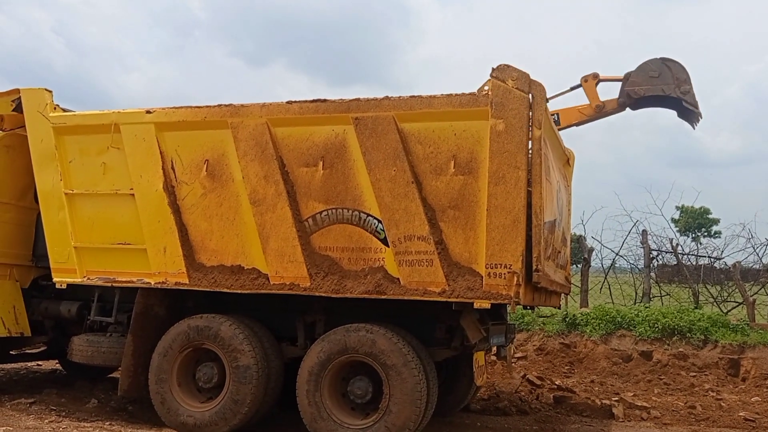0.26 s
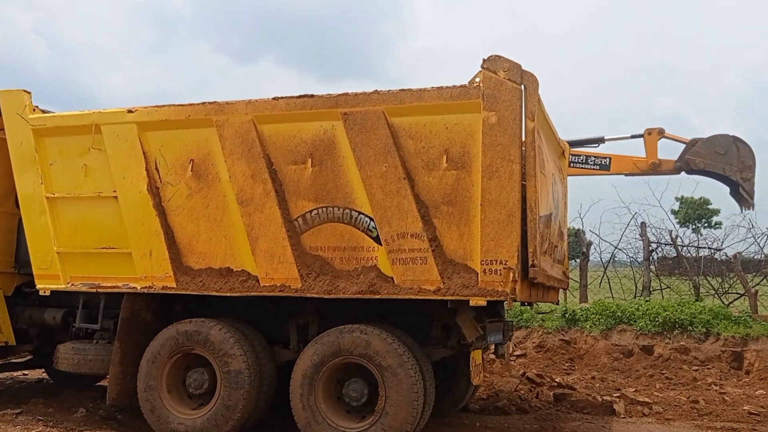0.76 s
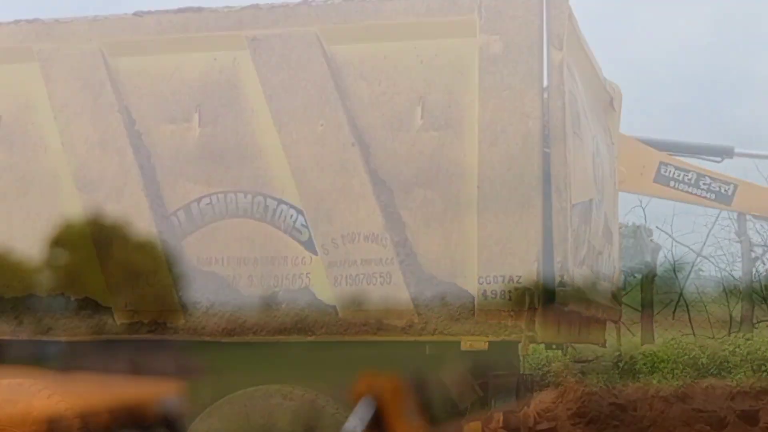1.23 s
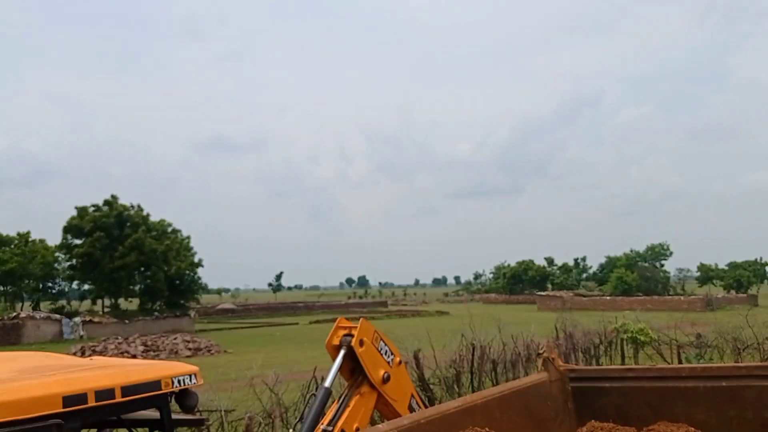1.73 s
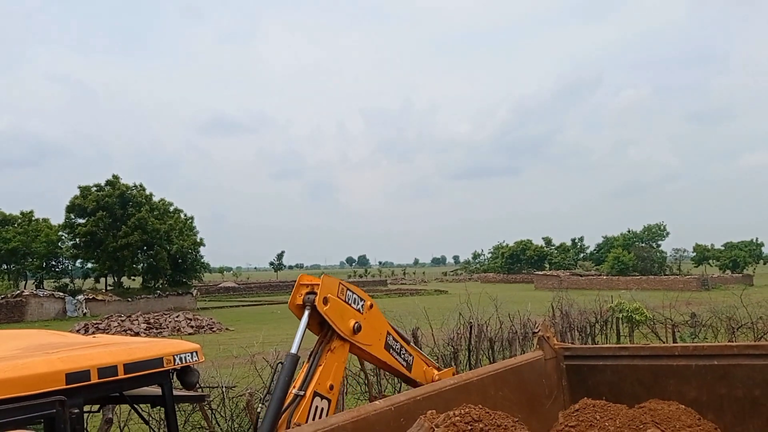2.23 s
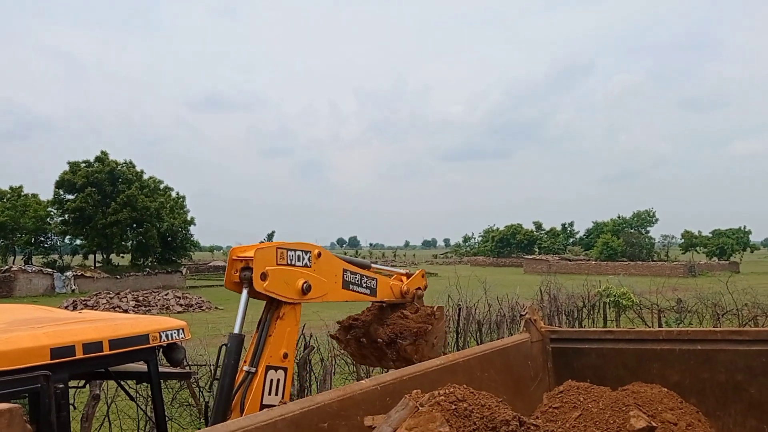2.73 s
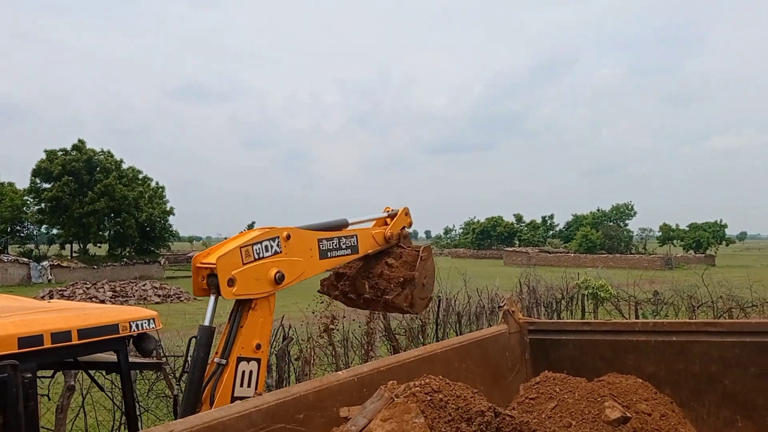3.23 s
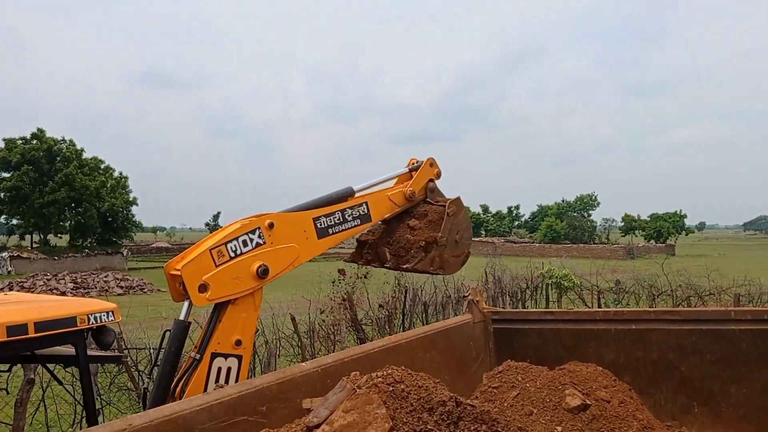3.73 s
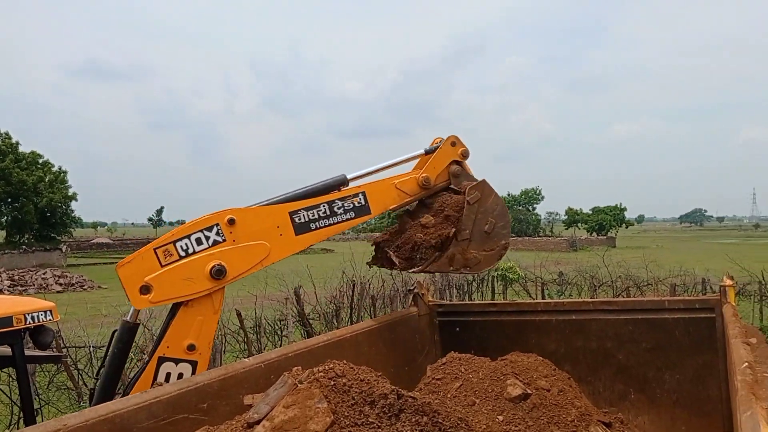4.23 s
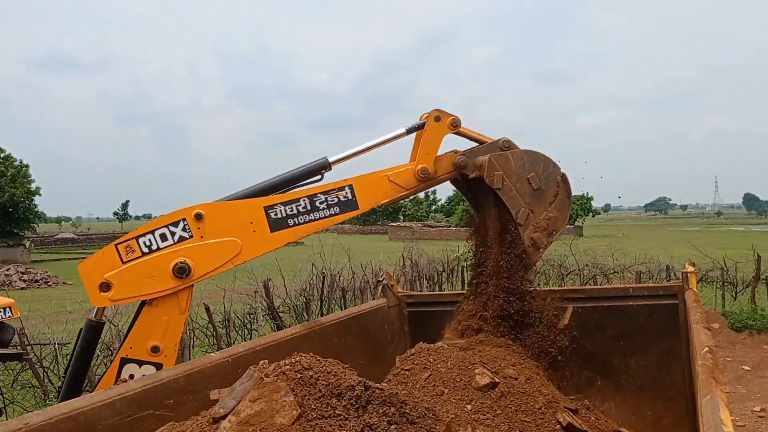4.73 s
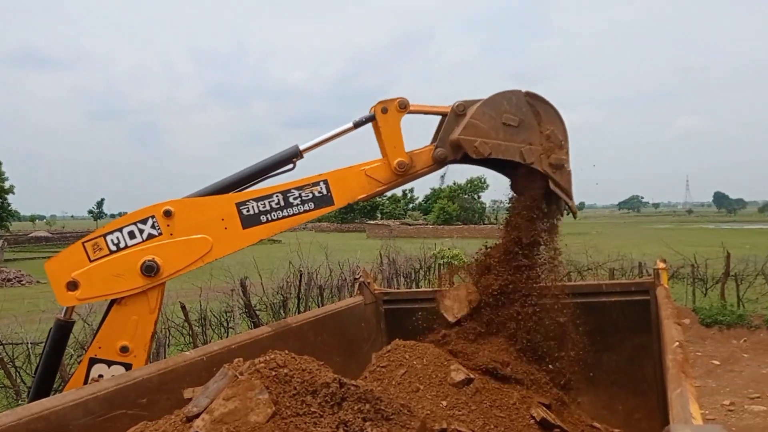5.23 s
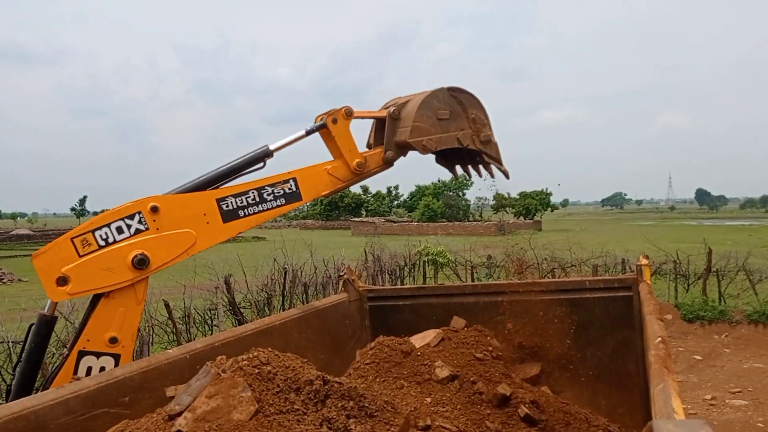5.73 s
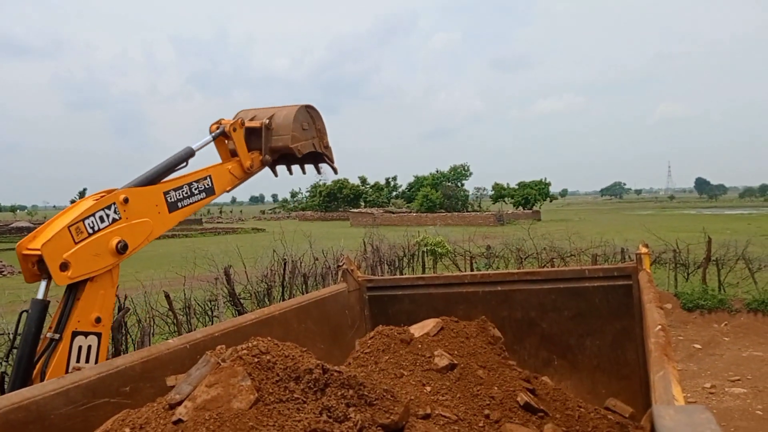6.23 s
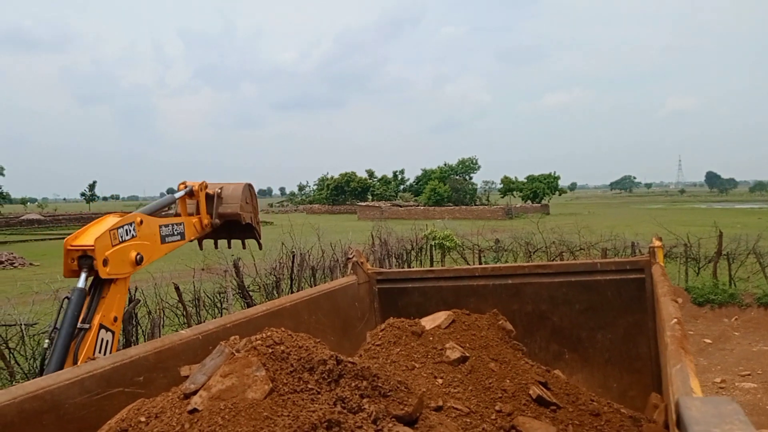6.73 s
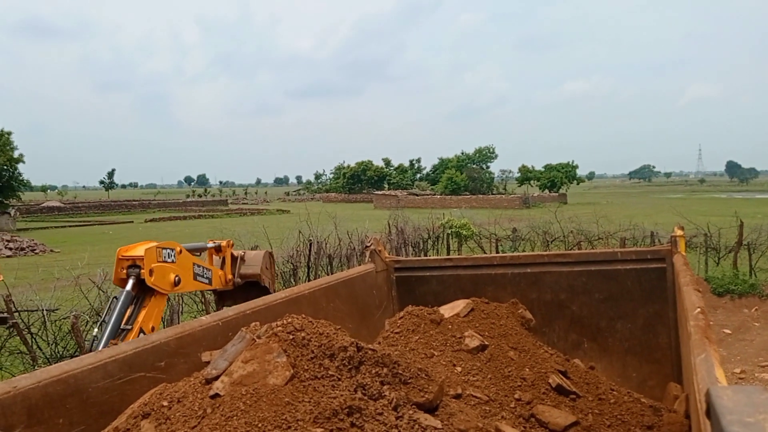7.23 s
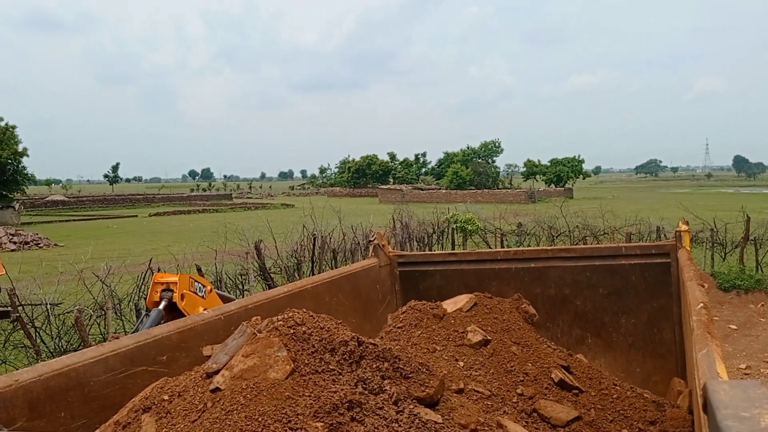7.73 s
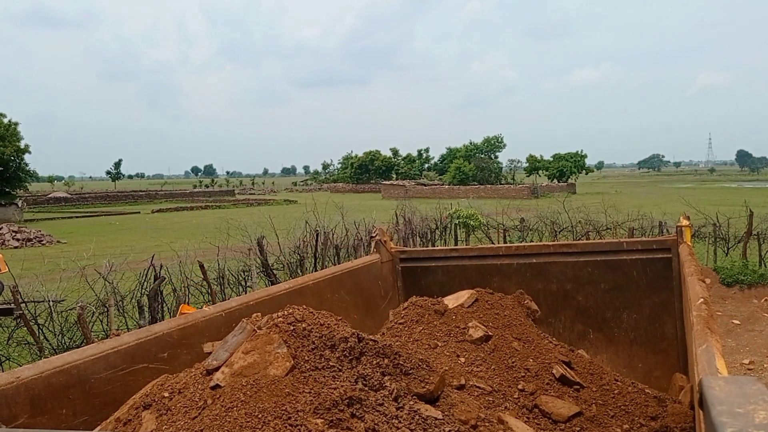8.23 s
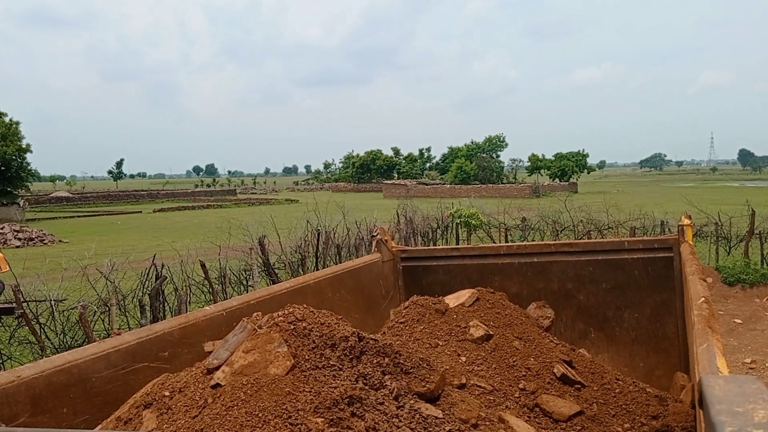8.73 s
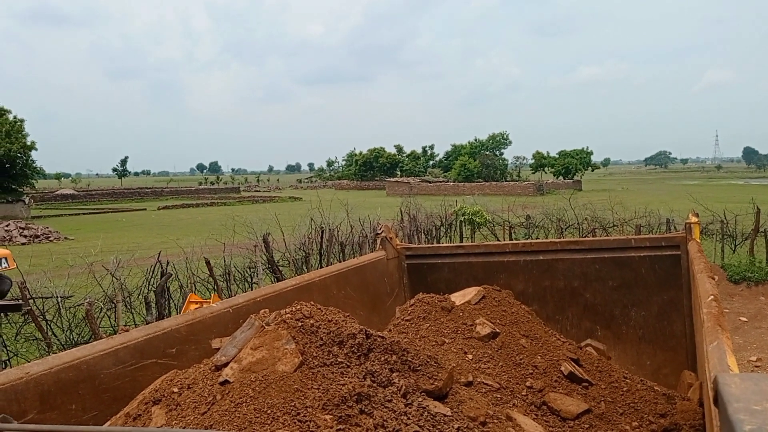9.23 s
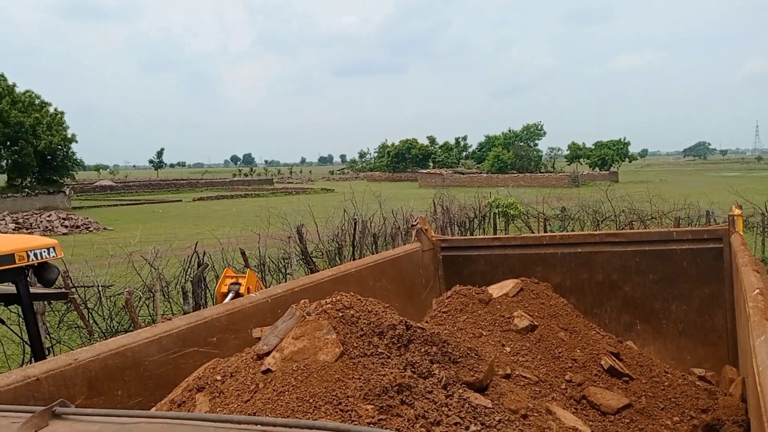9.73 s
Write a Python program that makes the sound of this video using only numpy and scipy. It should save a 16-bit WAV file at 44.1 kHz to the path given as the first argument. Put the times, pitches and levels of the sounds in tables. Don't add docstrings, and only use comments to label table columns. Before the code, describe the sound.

Muffled digger diesel with steel clanks at ground level, then a clearer engine swelling up, a bucketload of soil crashing down, and steady chugging.

```python
import sys
import numpy as np
from scipy import signal
from scipy.fft import rfft, irfft
from scipy.io import wavfile

SR = 44100
rng = np.random.default_rng(int(sys.argv[2]) if len(sys.argv) > 2 else 0)


def invert_db(level):
    return 10 ** (np.asarray(level, dtype=float) / 20)


def wrap_up_sound(samples):
    columns = np.atleast_2d(samples).T
    tamed = np.clip(columns, -1, 1)
    steps = np.round(tamed * 32767).astype(np.int16)
    wavfile.write(sys.argv[1], SR, steps)


N = 439677

CUT_S = 1.0
# (time [s], speed [cycles per s])
ENGINE_SPEED = [(0, 14.62), (.5, 15.13), (.999, 15.35), (1.0, 14.4), (1.6, 14.5), (2.8, 14.43),
                (3.05, 14.79), (4.45, 14.74), (4.7, 14.55), (4.95, 14.74), (5.66, 14.73), (5.87, 14.16),
                (6.2, 14.75), (6.85, 15.32), (8.35, 15.25), (8.68, 14.94), (9.1, 15.02), (9.97, 14.94)]
# (time [s], effort [0 idle - 1 full])
EFFORT = [(0, 0.85), (.45, 0.23), (.99, 0.039), (1.01, 1.16), (2.6, 1.15), (3.0, 1.22), (3.17, 0.43),
          (3.72, 0.85), (4.65, 1.03), (5.05, 0.92), (5.7, .55), (6.0, 1.22), (6.27, 1.18), (6.5, 0.21),
          (8.55, .05), (8.78, 0.69), (9.1, 0.36), (9.97, 0.56)]
# (level from above at no effort [dB], gain at full effort [dB],
# change on the ground [dB], share of the fades followed [0-1])
ENGINE_LAYERS = [
    (-40.5, 1.8, 0.5, 1),
    (-33, 8, -7.5, 1),
    (-26, -3.5, -23, 0.5),
    (-29.5, 0, -8.5, 1),
    (-41.5, -0.4, -2, 0.79),
]
GROUND_FADE_DB_PER_S = -4.5
FADE_IN_FROM, FADE_IN_S = 0.2, 0.49
THIRD_TUNED_ABOVE, THIRD_LOSS_DB = 14.74, 17
BARK, ECHO, KNOCK = 0.7, 1.12, 0.14
# (centre [Hz], width [Hz], level over the rumble [dB])
PIPE_RESONANCES = [(94.9, 28, -11), (152, 60, -8), (198, 44, -8.5), (229, 26, -5.5), (260, 18.7, -10.5),
                   (282, 23.5, -15.5), (351.2, 38, -10), (399, 51, -14), (436, 23, -20), (552.1, 69.7, -10),
                   (599, 23, -17.5)]
PIPE_FLOOR_DB = -30.5
FIRING_IDLE_DB, FIRING_PULL_DB = -11, 14.5
# (multiple [of cycle rate], level [dB])
FAVOURED = [(16, -5.5), (21, -3), (25, -4.5), (27, -6), (32, 12.5), (36, 0), (37, 3), (38, -12)]
# (frequency [Hz], level [dB per Hz])
EXHAUST_RUMBLE = [(18, -44), (30, -10.5), (76, -16.5), (114, -5.5), (188, -5), (296, -6.5), (348, -2),
                  (473, -8), (556, -14), (644, -21.5), (1000, -28), (1300, -60), (2200, -120)]
# (frequency [Hz], level [dB per Hz])
BLOCK_CLATTER = [(410, -34), (700, -1), (800, -1.5), (950, -5), (1440, -11.5), (1730, -8.5), (1920, -10.5),
                 (2400, -13.5), (2790, -15), (3760, -18.5), (5200, -20.5), (5700, -22), (6600, -21.5),
                 (16000, -36)]
# (time [s], peak level [dB], pitch [Hz], time to fall 60 dB [s], spread [octaves])
STEEL_RINGS = [(0.31, -17.5, 176.6, 0.22, 0.13), (.347, -22.5, 1100, 0.059, 0.041),
               (.355, -22, 245, 0.34, 0.094), (.412, -25.5, 256, 0.23, 0.068),
               (4.686, -14, 168, 0.45, 0.02), (4.772, -16.5, 670, 0.12, .03),
               (4.942, -19.5, 910, 0.015, 0.14), (5.343, -17, 406, 0.07, 0.26),
               (5.453, -22, 890, 0.02, 0.42), (6.523, -25, 2260, 0.079, 0.068),
               (8.643, -34, 2190, 0.22, 0.082), (.615, -42, 2240, 0.35, 0.029),
               (.305, -40, 2040, .2, 0.089), (0.303, -27, 1450, .18, 0.23),
               (4.85, -16.5, 163.6, .25, 0.104), (5.335, -24, 146, .2, .1), (4.843, -40, 8800, 0.13, .07),
               (4.916, -33, 7440, 0.17, 0.18), (4.996, -36, 2250, 0.23, 0.036),
               (4.997, -42, 5330, .12, .08), (4.997, -48, 10000, .1, .02)]
# (time [s], level [dB], centre [Hz], width [octaves])
BANGS = [(.25, -29.5, 230, 1.5), (.28, -31.5, 530, 0.36), (.302, -30, 1360, 1.05), (.325, -51.5, 3970, 2.3),
         (.337, -30, 1320, 1.07), (4.695, -24, 334, 0.76), (4.84, -23, 310, 0.33), (5.33, -27, 283, 0.82),
         (4.70, -30, 690, 1.04), (4.828, -25, 490, 1.3)]
BANG_HOLD_S, BANG_T60_S = 0.011, 0.32
# (time [s], level [dB], centre [Hz], width [octaves])
CLODS = [(.255, -35.5, 1190, 0.91), (.3, -46.5, 4000, 1.6), (4.38, -40.5, 2000, 1.4),
         (4.855, -47, 1710, 1.6), (5.05, -40, 980, 0.94), (4.675, -45, 2000, 3.6), (4.694, -39, 2480, 3.0),
         (4.928, -33.5, 2530, 1.6), (4.938, -31, 895, 2), (4.995, -46, 5460, 2.4), (5.02, -48, 4800, 0.55),
         (5.11, -55.5, 8000, 1.2), (5.179, -49, 3000, 3.1), (5.327, -36.5, 2630, 1.27),
         (5.333, -32, 895, 2), (5.517, -51, 6940, 1.6), (6.042, -43.5, 4000, 1.7), (6.306, -37, 4940, 1.6),
         (6.313, -36.5, 1300, 1.8), (6.474, -51.5, 6160, .9), (6.479, -38, 1190, 2.2),
         (6.484, -44, 2700, 0.97), (6.523, -37.5, 1100, 0.86), (6.81, -40, 2150, 0.77),
         (6.809, -48, 7800, 1.3), (7.038, -51, 5900, 2.9), (7.665, -39.5, 1000, 1.3),
         (8.64, -40.5, 1800, 1.6)]
CLOD_HOLD_S, CLOD_T60_S = 0.014, 0.11
# (time [s], level [dB], centre [Hz], width [octaves])
TICKS = [(.097, -55, 9000, .8), (.197, -52, 8500, 0.7), (.237, -32, 1480, 0.76), (.413, -48, 8000, 0.96),
         (.781, -42, 1100, 1.3), (2.698, -42, 5430, 0.17), (4.365, -35, 2980, 0.53),
         (4.809, -28.5, 6660, 0.58), (4.81, -35.5, 11600, .7), (4.827, -32, 2150, 1.4),
         (4.841, -31, 1700, 0.84), (4.914, -36, 5930, 1.1), (5.07, -61, 1300, 0.75),
         (5.389, -43.5, 4700, 1), (6.473, -30, 2850, 0.93), (6.473, -29.5, 2100, .37)]
TICK_HOLD_S, TICK_T60_S = 0.0037, 0.028
# (time [s], hiss level [dB])
SOIL_FLOW = [
    (4.3, -70),
    (4.65, -68),
    (4.8, -60),
    (5.15, -56),
    (5.5, -63.5),
    (5.8, -67.5),
    (6.05, -58),
    (6.4, -69.5),
    (6.6, -78),
]
GRAVEL_PER_S, GRAVEL_DB = 400, 9.5
# (frequency [Hz], level [dB])
GROUND_COLOUR = [(60, -3), (200, 3), (340, 0), (450, -6.5), (580, 1.5), (1070, -1), (1250, -3.5),
                 (1610, -2.5), (1870, -10.5), (2100, 0.5), (2950, -3), (3300, 0.5), (3650, -2), (4100, -2)]
# (frequency [Hz], level [dB])
MICROPHONE = [(25, -9), (45, -3.5), (60, 1), (6700, -1.5), (8000, -7), (10000, -9), (12000, -17),
              (13900, -15), (14700, -6), (15400, -7)]
CUTOFF_HZ = 15500


def rms_one(x):
    return x / np.sqrt(np.mean(x ** 2) + 1e-20)


def in_time(rows):
    s, *columns = np.transpose(rows)
    return [np.interp(np.arange(N) / SR, s, column) for column in columns]


def at_hz(points, hz):
    point_hz, point_db = np.transpose(points)
    return invert_db(np.interp(np.log(hz + 1), np.log(point_hz), point_db))


def drift(rate, size=1):
    r = np.exp(-80 * np.pi * rate / SR)
    noise = rng.standard_normal(N // 40 + 2002)
    slow = signal.lfilter([1], [1, -2 * r, r * r], noise)[2000:]
    return np.interp(np.arange(0, N, size) / 40, np.arange(len(slow)), rms_one(slow))


def band(x, low_hz, high_hz, order=2):
    edges = np.clip([low_hz, high_hz], 10, SR / 2.1)
    return signal.sosfilt(signal.butter(order, edges, "band", fs=SR, output="sos"), x)


def filtered(x, gain):
    return irfft(rfft(x) * gain, N)


def noise_band(low_hz, high_hz):
    return rms_one(band(rng.standard_normal(N), low_hz, high_hz))


def coloured(spectrum, low_hz, high_hz):
    noise = filtered(rng.standard_normal(N), at_hz(spectrum, np.fft.rfftfreq(N, 1 / SR)))
    return noise / np.std(band(noise, low_hz, high_hz, order=4))


def levels(cycles, effort):
    t = np.arange(N) / SR
    on_ground = t < CUT_S
    swell = np.clip(FADE_IN_FROM + (1 - FADE_IN_FROM) * (t - CUT_S) / FADE_IN_S, 0.01, 1)
    fade_db = np.where(on_ground, GROUND_FADE_DB_PER_S * t, 20 * np.log10(swell))
    first, second, third, rumble, block = [
        idle_db + pull_db * effort + ground_db * on_ground + share * fade_db
        for idle_db, pull_db, ground_db, share in ENGINE_LAYERS]
    third = third - THIRD_LOSS_DB * np.maximum(THIRD_TUNED_ABOVE - cycles, 0)
    return [first, second, third], rumble, block


def firing_orders(turn, orders_db):
    since = turn - 2 * np.pi * BARK
    tones = 0
    for k, db in enumerate(orders_db):
        level = invert_db(db + 0.96 * drift(2.25)) * np.sqrt(2)
        tones = tones + level * np.cos(4 * (k + 1) * since + 0.51 * k)
    return tones


def pipe_gain(hz):
    centre, width, db = np.transpose(PIPE_RESONANCES)
    peaks = invert_db(db) / (1 + (2 * (hz[:, None] - centre) / width) ** 2) ** 2
    return invert_db(PIPE_FLOOR_DB) + peaks.sum(axis=1)


def uneven_cylinders(turn, cycles, load):
    turn, cycles, load = turn[::8], cycles[::8], load[::8]
    tremble = drift(8.3, size=8)
    speeds = np.linspace(14, 15.5, 60)
    tones = 0
    for k in range(3, 45):
        if k in (4, 8, 12):
            continue
        scatter = (0.9 if k > 19 else 3) * rng.standard_normal()
        waver_db = 2 * drift(4, size=8)
        slip = 0.4 * drift(4, size=8)
        bias_db = dict(FAVOURED).get(k, 0)
        if k % 4 == 0 and k <= 32:
            bias_db = bias_db + FIRING_IDLE_DB + FIRING_PULL_DB * load
        lag = 2 * np.pi * (BARK if k < 34 else ECHO)
        height = np.interp(cycles, speeds, pipe_gain(k * speeds)) * invert_db(waver_db + 0.12 + bias_db)
        tones = tones + height * np.cos(k * (turn - lag + 0.0045 * tremble) + scatter + slip)
    return signal.resample_poly(tones, 8, 1)[:N]


def exhaust_turbulence(turn, load):
    since = turn - 2 * np.pi * BARK
    puffs = 1 + 0.05 * np.cos(4 * since) + 0.097 * np.cos(since)
    surges = invert_db(0.96 * drift(2.9) - 10) * (0.32 + load) * (1 + np.cos(since)) ** 2
    tailpipe = surges * noise_band(351, 410) / 1.84
    return tailpipe + invert_db(-2.5) * puffs * coloured(EXHAUST_RUMBLE, 180, 700)


def clatter(turn, load, clatter_db):
    firings = 4 * (turn / (2 * np.pi) + 1 - KNOCK)
    count = firings.astype(int)
    cylinder_db = np.array([1.6, 0.5, 6.0, 1.0])[count % 4]
    knock_db = cylinder_db + 1.3 * np.clip(rng.standard_normal(1000), -2, 2)[count]
    pulse = np.sin(np.pi * np.sqrt(firings - count)) ** 3
    gate = 1 + (0.17 + 0.19 * load ** 2) * invert_db(knock_db) * pulse
    hiss = coloured(BLOCK_CLATTER, 950, 11000)

    t = np.arange(SR // 10) / SR
    blocks = hiss[:4 * len(t)].reshape(4, -1) * invert_db(-60 * t / 0.13) * (1 - np.exp(-t / 0.0054))
    fired = np.diff(count, prepend=count[0]) * invert_db(knock_db)
    knocks = 0
    for k, block in enumerate(blocks):
        knocks = knocks + signal.oaconvolve(fired * (count % 4 == k), block + 1.28 * blocks[0])[:N]
    wandering = np.arange(N) + 8.3 * drift(8.0)
    uneven = np.interp(wandering, np.arange(N), knocks) * invert_db(2.2 * drift(51.0))
    ringing = invert_db(-8 + 6.5 * load ** 2 + 1.7 * drift(4.6)) * rms_one(band(uneven, 716, 1460))

    pump = invert_db(-20) * noise_band(3285, 3375) * (np.arange(N) < CUT_S * SR)
    valves = invert_db(-22) * load ** 2 * gate * noise_band(5000, 5600)
    return invert_db(clatter_db + 0.4 * drift(6.9)) * (hiss * gate / 1.478 + ringing + pump + valves)


def steel_rings():
    out = np.zeros(N + SR)
    t = np.arange(SR // 2) / SR
    luck = rng.standard_normal((len(STEEL_RINGS), 3, 6))
    for (s, db, hz, t60, spread), (pitch, size, start) in zip(STEEL_RINGS, luck):
        mode_hz = hz * 2 ** (spread * (pitch - pitch.mean()))
        modes = invert_db(2.9 * size) * np.sin(2 * np.pi * mode_hz * t[:, None] + start)
        shape = invert_db(-60 * t / t60) * (1 - np.exp(-t * hz / 1.7))
        blow = modes.sum(axis=1) * shape
        out[round(s * SR):][:len(t)] += invert_db(db) * blow / np.abs(blow).max()
    return out[:N]


def crunches():
    out = np.zeros(N + SR)
    t = np.arange(SR // 3) / SR
    kinds = [(BANGS, BANG_HOLD_S, BANG_T60_S), (CLODS, CLOD_HOLD_S, CLOD_T60_S),
             (TICKS, TICK_HOLD_S, TICK_T60_S)]
    for rows, hold, t60 in kinds:
        shape = invert_db(-60 * np.maximum(t - hold, 0) / t60) * (1 - np.exp(-t / 0.00061))
        for s, db, hz, width in rows:
            grit = rng.standard_normal(len(t)) * invert_db(3 * rng.exponential(1, len(t)))
            lumps = invert_db(np.repeat(rng.standard_normal(len(t) // 100), 100))
            burst = band(grit * lumps * shape, hz * 2 ** (-width / 2), hz * 2 ** (width / 2))
            burst = burst * np.linalg.norm(shape) / np.linalg.norm(burst)
            out[round(s * SR):][:len(t)] += invert_db(db) * burst
    return out[:N]


def soil_flow_db():
    before, after = (SOIL_FLOW[0][0] - 0.1, -110), (SOIL_FLOW[-1][0] + 0.1, -110)
    return in_time([before, *SOIL_FLOW, after])[0]


def grains(per_s, clump_rate, spread_db, largest):
    born = rng.random(N) < per_s * invert_db(5 * drift(clump_rate)) / SR
    return born * rng.standard_normal(N) * invert_db(spread_db * np.minimum(rng.exponential(1, N), largest))


def gravel():
    pieces = grains(GRAVEL_PER_S, 12.0, 5.0, 4)
    return invert_db(soil_flow_db() + GRAVEL_DB) * rms_one(band(pieces, 800, 4500, order=1))


def pouring_soil():
    crumbs = grains(5000, 20.5, 4.2, 2.8)
    return invert_db(soil_flow_db() + 2.5) * rms_one(band(crumbs, 2500, 18000, order=1))


def scene():
    (cycles,), (load,) = in_time(ENGINE_SPEED), in_time(EFFORT)
    orders_db, rumble_db, clatter_db = levels(cycles, load)
    turn = 2 * np.pi * np.cumsum(cycles) / SR
    firing = firing_orders(turn, orders_db)
    rumble = invert_db(rumble_db) * (uneven_cylinders(turn, cycles, load) + exhaust_turbulence(turn, load))
    blows = crunches()
    echo = invert_db(-17) * np.roll(band(blows, 200, 4500, order=1), round(0.018 * SR))
    above = rumble + clatter(turn, load, clatter_db) + blows + echo
    below = filtered(above, at_hz(GROUND_COLOUR, np.fft.rfftfreq(N, 1 / SR)))
    heard = np.where(np.arange(N) < CUT_S * SR, below, above)
    return (firing + steel_rings() + gravel() + pouring_soil() + heard)[None]


def band_limit(x):
    return signal.sosfilt(signal.butter(12, 16860, fs=SR, output="sos"), x)


def record(dry):
    hz = np.fft.rfftfreq(N, 1 / SR)
    top_edge = np.where(hz < CUTOFF_HZ, 1, invert_db(-41.5))
    return band_limit(filtered(dry, at_hz(MICROPHONE, hz) * top_edge))


dry = scene()
out = record(dry)
wrap_up_sound(out)
```